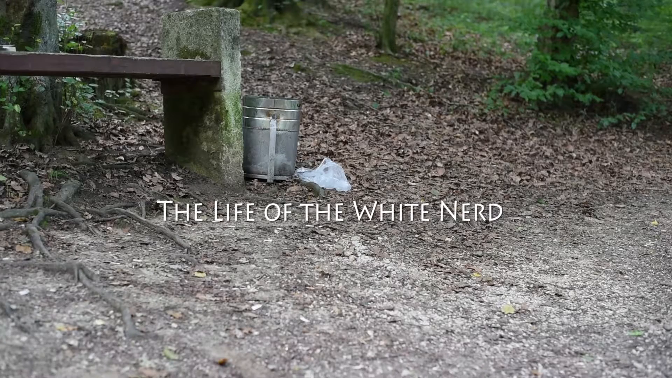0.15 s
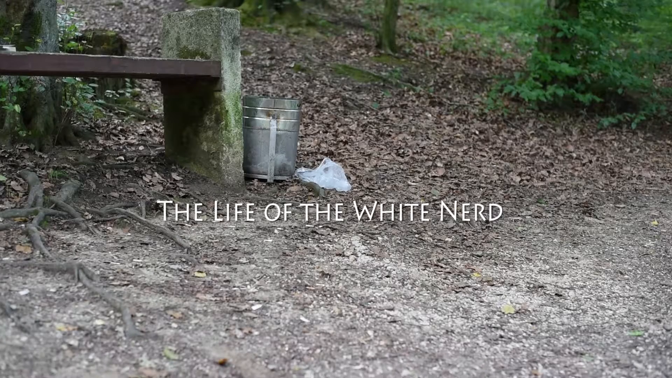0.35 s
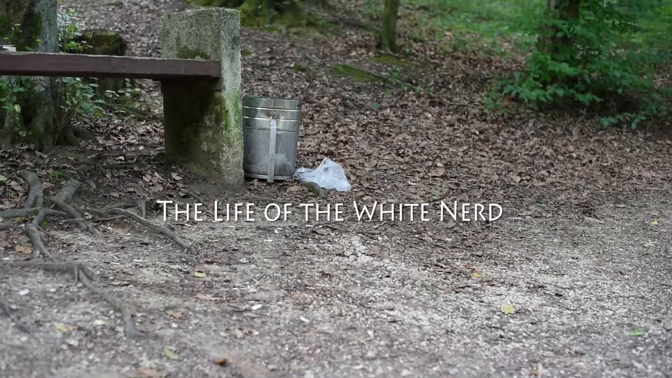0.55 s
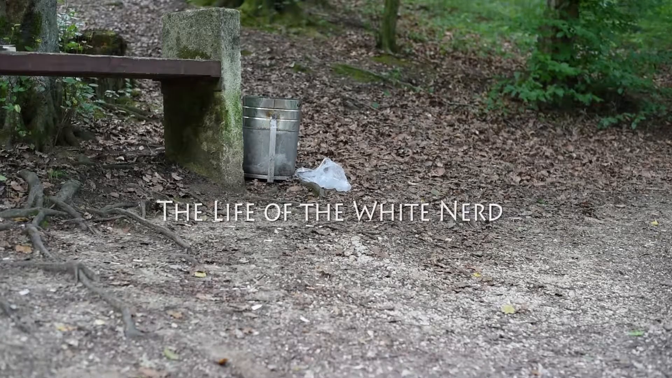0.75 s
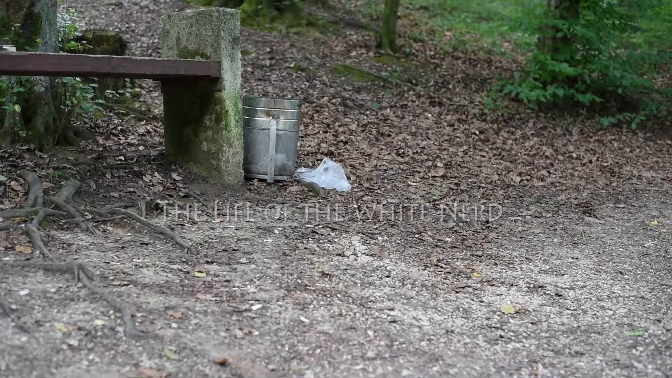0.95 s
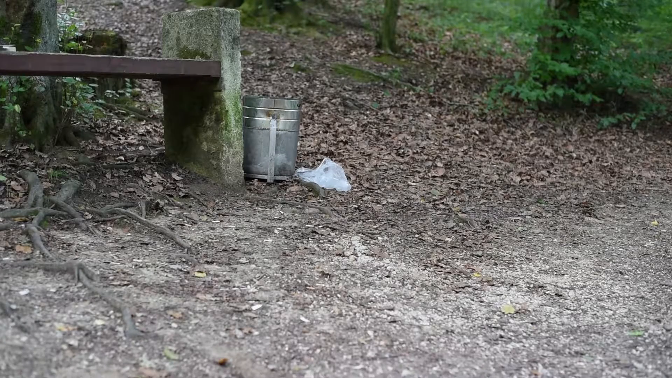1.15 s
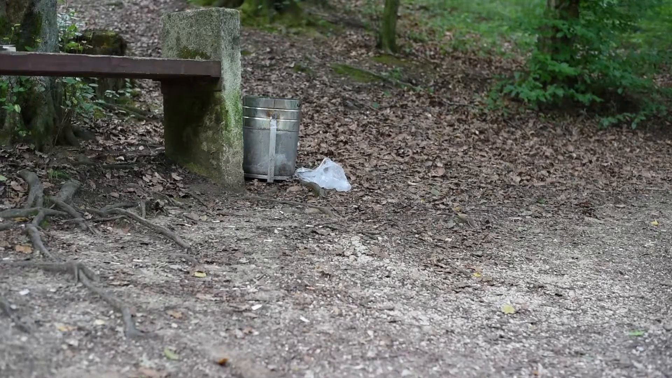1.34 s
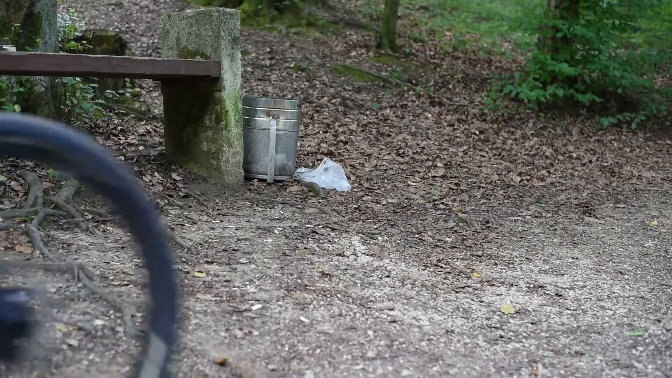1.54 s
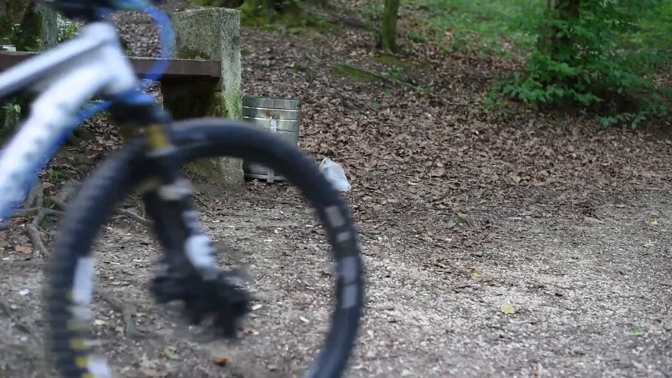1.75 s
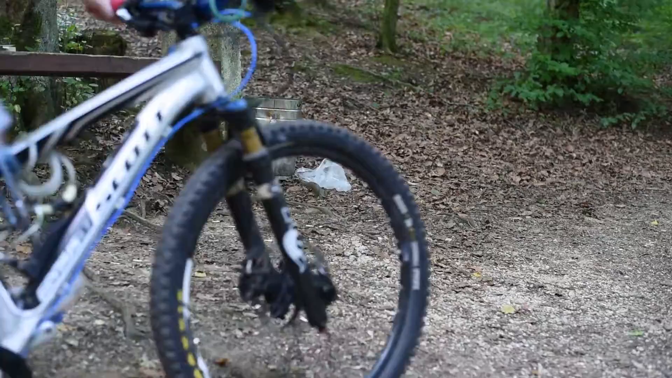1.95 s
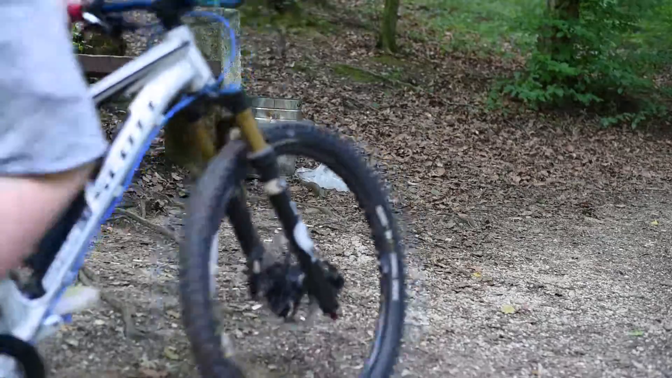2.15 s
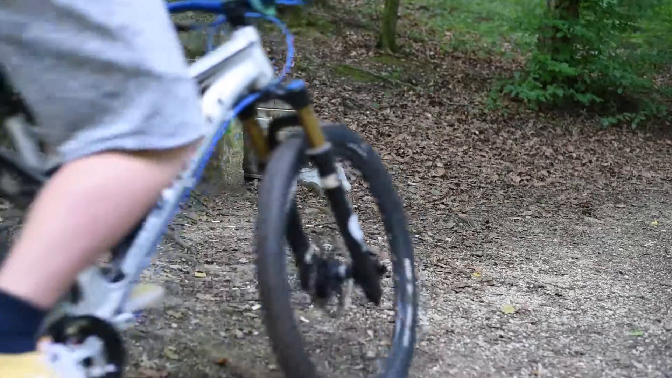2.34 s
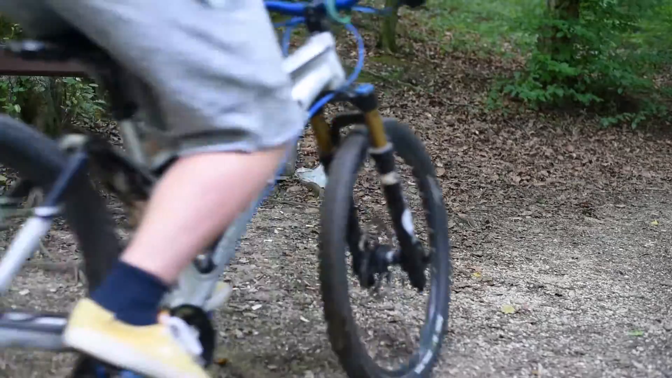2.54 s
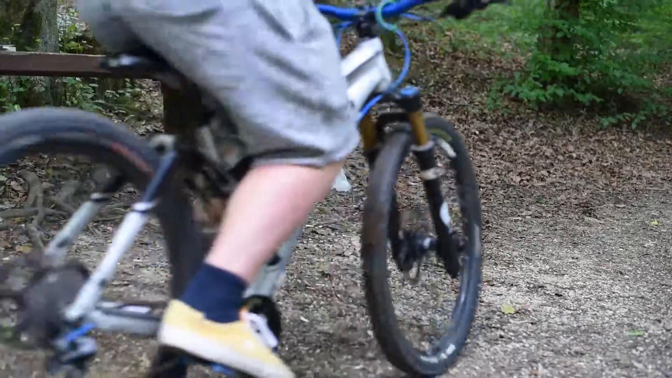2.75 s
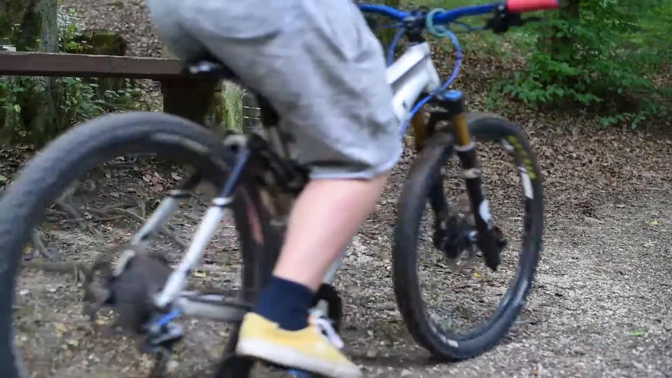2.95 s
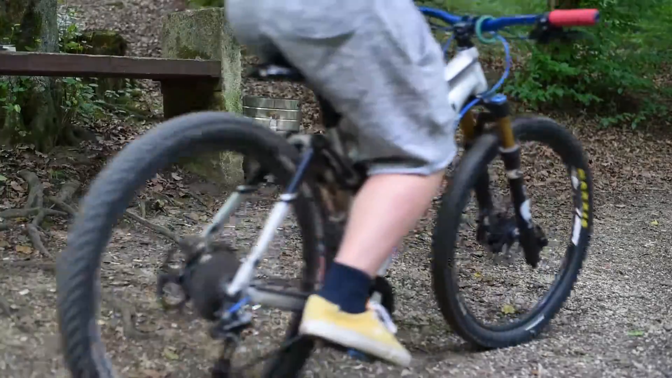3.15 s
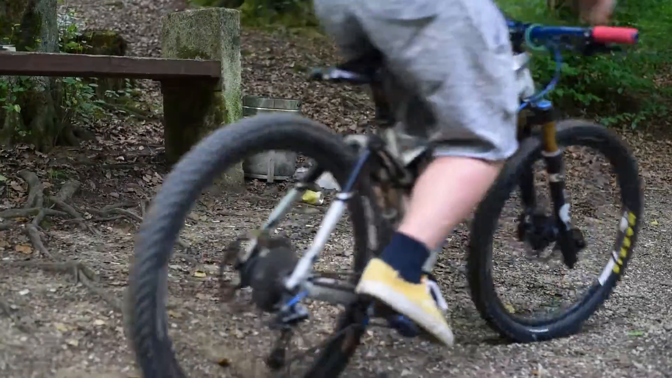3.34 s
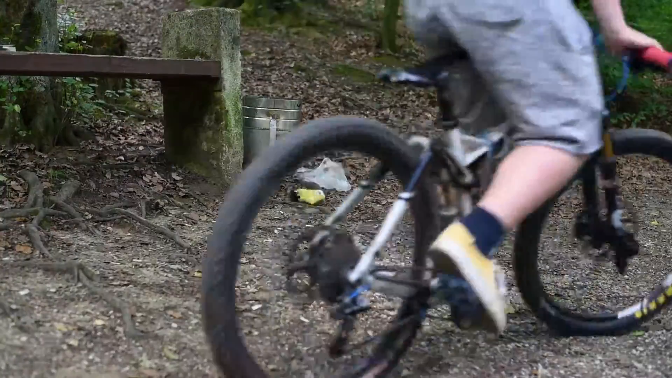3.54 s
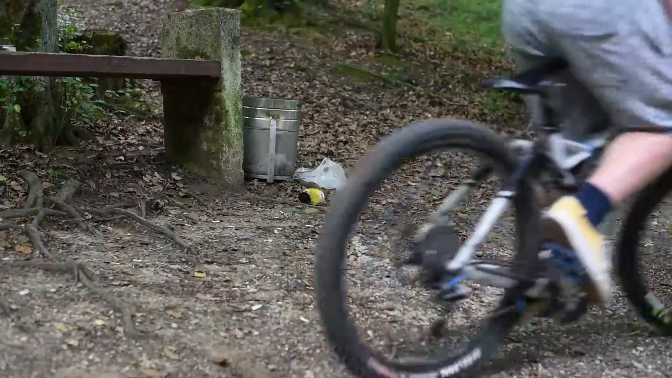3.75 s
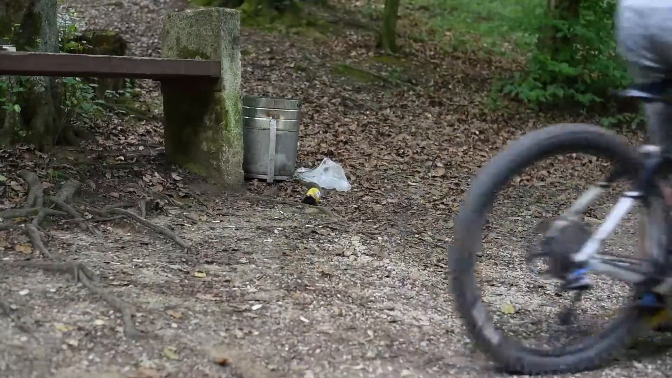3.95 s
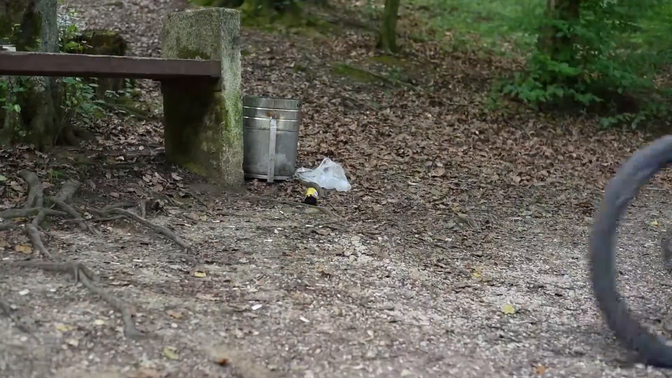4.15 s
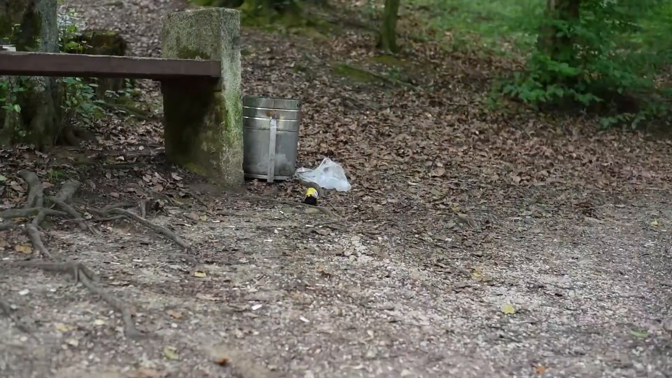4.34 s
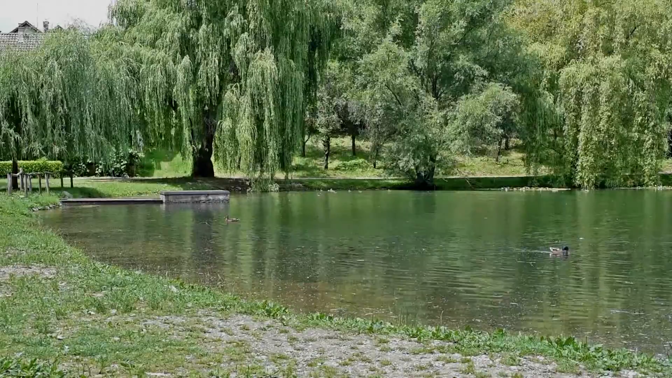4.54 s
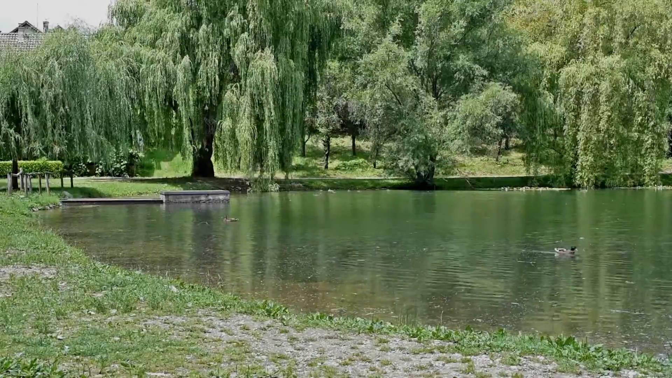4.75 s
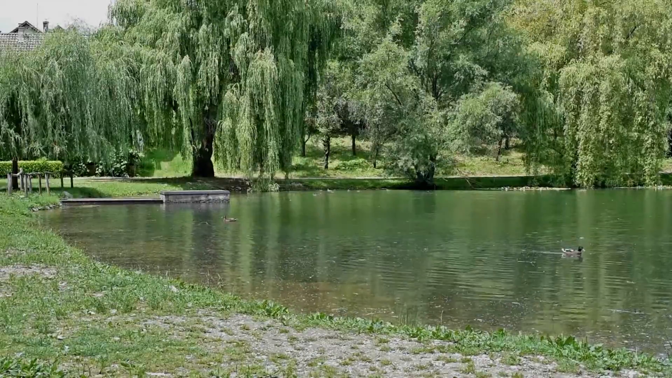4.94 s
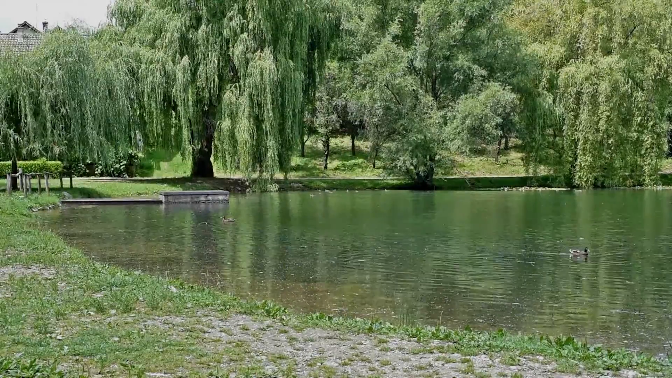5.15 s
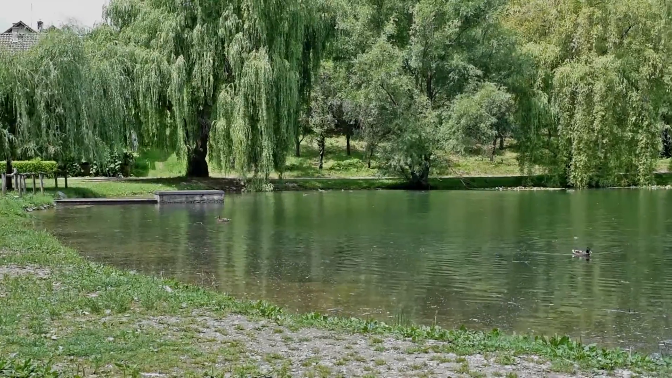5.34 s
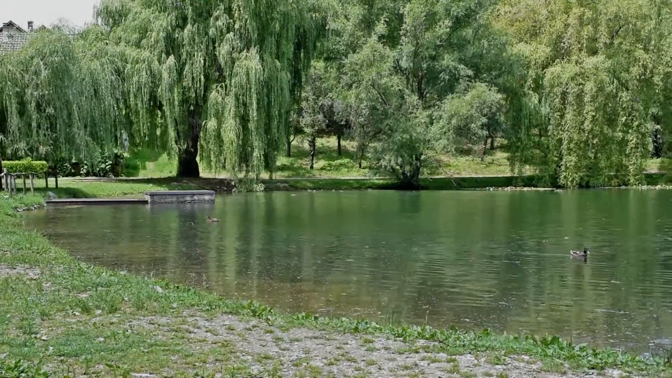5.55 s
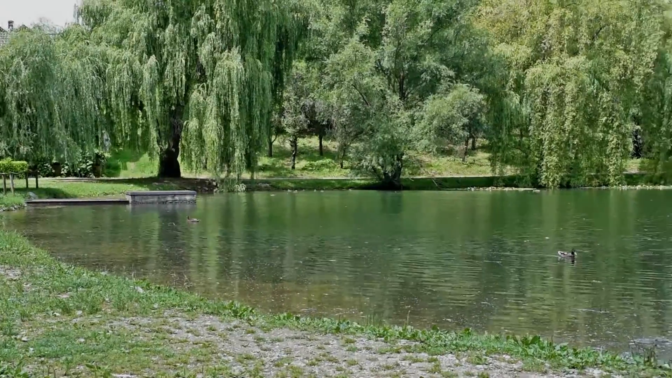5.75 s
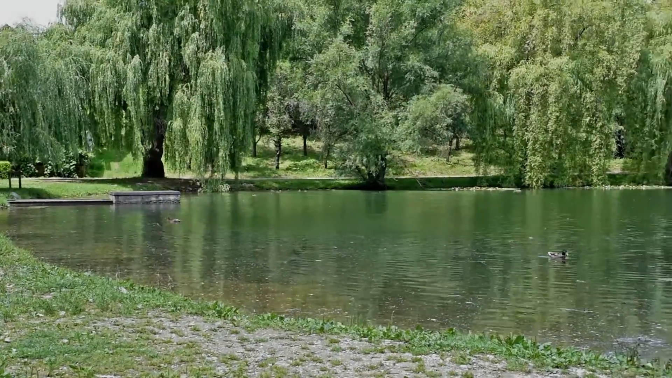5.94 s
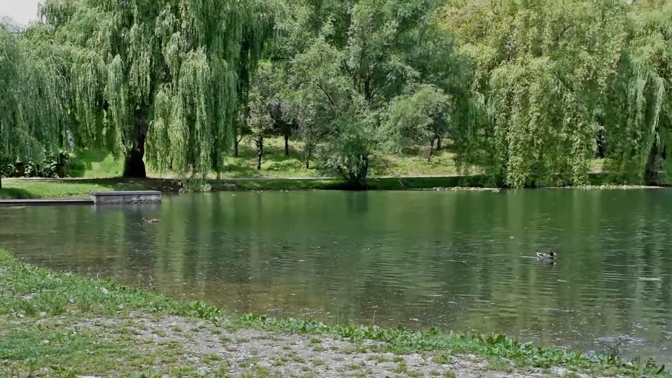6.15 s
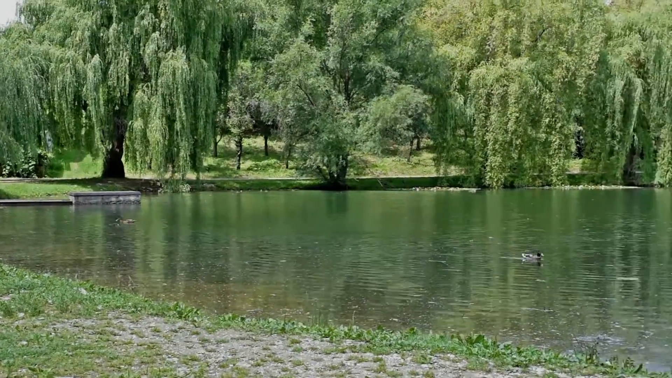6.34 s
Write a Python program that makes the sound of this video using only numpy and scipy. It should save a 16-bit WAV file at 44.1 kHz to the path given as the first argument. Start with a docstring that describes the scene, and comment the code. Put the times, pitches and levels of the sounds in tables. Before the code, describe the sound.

A quiet wood with soft air and short, echoing bird whistles; faint gravel crunch and a few pebble snaps come from the left. From about 1.0 to 1.8 seconds a freewheel ticks evenly and the tyres draw near over grit and dry leaves. The crunch peaks near 1.8-2.0 with dull thumps and sharp stone cracks. At 2.2-2.45 the chain rattles quickly, then a narrow metallic scrape slides upward until 2.6. Crisp clicks lead to heavy, jingling chain clanks at 2.98 and 3.06, with lighter knocks to 3.7. The bike moves right, leaving softer crunch, stray stone snaps and gear clicks. Birds brighten, strongest around 4.5-5.0, over a faint low engine throb. Around 5.0-5.5 faint ticks and crunch vanish as the wood fades into lakeside air, with a drawn-out call and rapid thin chirps from 6 seconds to the end.

```python
"""Tyres crunch softly over gravel in a quiet wood with birdsong; a mountain bike coasts past, left to right.
Random grains of grit and leaves make the crunch; short cracks with noise make stones, thumps and freewheel ticks.
The chain knocks, rings the frame and jingles through a gear change, and its drag sings through sliding resonances.
Birds are sliding whistles with echo, a far engine is a few harmonics, the air is coloured noise.
At the end the wood fades into a lakeside with other birds."""
import sys
import numpy as np
from scipy import signal
from scipy.fft import rfft, irfft
from scipy.io import wavfile
from scipy.ndimage import map_coordinates

SR = 44100
rng = np.random.default_rng(int(sys.argv[2]) if len(sys.argv) > 2 else 0)


def digitize_waveform(pressure):
    """Quantize a signal to 16-bit integers and store it at the path in sys.argv[1].

    Rows of a 2-D input are taken as channels; values are limited to [-1, 1].
    """
    field = np.atleast_2d(pressure).T
    bounded = np.clip(field, -1, 1)
    quanta = np.round(bounded * 32767).astype(np.int16)
    wavfile.write(sys.argv[1], SR, quanta)


N = 282240
T = np.arange(N) / SR


def amp(db):
    """Decibels to gain."""
    return 10 ** (np.asarray(db) / 20)


def unit(x):
    """Scales to rms 1."""
    return x / np.sqrt(np.mean(x ** 2) + 1e-20)


def read(points, hz):
    """A spectrum table read on a log-frequency axis."""
    f, value = np.transpose(points)
    return np.interp(np.log(hz + 1), np.log(f), value)


def curves(rows):
    """The columns of a time table at every sample."""
    s, *columns = np.transpose(rows)
    return [np.interp(T, s, column) for column in columns]


def add(mix, s, sound):
    """Mixes a sound in at time s."""
    part = mix[max(round(s * SR), 0):][:len(sound)]
    part += sound[:len(part)]


def drift(hz, size=N):
    """Slow random signal of rms 1, up to about hz."""
    lowpass = 1 + (np.fft.rfftfreq(size, 1 / SR) / hz) ** 4
    return unit(irfft(rfft(rng.standard_normal(size)) / lowpass, size))


def colour(x, points):
    """Minimum-phase filter of unit energy with the given spectrum, so that attacks stay sharp."""
    log_gain = np.log(amp(read(points, abs(np.fft.fftfreq(4096, 1 / SR)))))
    taps = np.fft.ifft(np.exp(np.conj(signal.hilbert(log_gain)))).real[:2048]
    return signal.oaconvolve(x, taps / np.linalg.norm(taps))[:len(x)]


def echo(x, t60s):
    """Diffuse stereo tail of noise, each band dying at its own speed."""
    hz, t, z = signal.stft(rng.standard_normal((2, SR)), SR, nperseg=256)
    tail = signal.istft(z * amp(-60 * t / read(t60s, hz)[:, None]), SR, nperseg=256)[1]
    tail = np.pad(tail, ((0, 0), (SR // 1500, 0)))  # starts 0.66 ms late
    return signal.fftconvolve(x[None], tail / np.linalg.norm(tail[0]), axes=1)[:, :N]


def place(x, side, lag_s=0.00016, shade_db=2.0, treble_shade_db=6.5, scatter_db=-5, split_hz=4000):
    """The nearer microphone hears a source sooner and louder, most of all its treble, which the ground scatters."""
    pair = np.array([map_coordinates(x, [(T + ear * side * lag_s) * SR], order=3) for ear in (-1, 1)])
    highpass = signal.butter(1, min(split_hz, SR / 4), "high", fs=SR)
    treble = signal.lfilter(*highpass, pair)
    toward = np.array([[-1], [1]]) * side
    scatter = amp(scatter_db) * echo(signal.lfilter(*highpass, x), [(500, 0.055), (10000, 0.028)])
    return amp(toward * shade_db) * (pair - treble) + amp(toward * treble_shade_db) * (treble + scatter)


def crack(t, hz, cycles):
    """A blow that swells and dies within a few cycles."""
    u = t * hz / cycles
    return np.sin(2 * np.pi * hz * t) * u * np.exp(1 - u)


def air(points, coherence, swell_db):
    """Distant wash of the open air: coloured noise, its likeness on the two sides set per frequency."""
    hz = np.fft.rfftfreq(N, 1 / SR)
    a, b = rfft(rng.standard_normal((2, N))) * amp(read(points, hz))
    alike = np.clip(read(coherence, hz), -1, 1)
    pair = np.array([a, alike * a + np.sqrt(1 - alike ** 2) * b])
    return unit(irfft(pair, N)) * amp(swell_db * drift(10.6))


# Wash of each place. Each row: frequency in Hz, relative density in dB per Hz.
FOREST_AIR_SPECTRUM = [(20, -34), (45, 0), (80, -1), (130, 6.5), (250, 2), (500, -4), (1000, -27),
                       (2000, -13), (3000, 0.5), (5000, -3), (9000, -8), (16000, -23.5)]
LAKE_AIR_SPECTRUM = [(25, -12), (160, 1), (450, -9.5), (640, -18), (1100, -11.5), (1800, -20.5),
                     (2600, -29.5), (4100, -31), (5200, -46), (10700, -36.5), (16000, -39)]
# Likeness of the two sides. Each row: frequency in Hz, coherence (no unit, clipped to -1..1).
FOREST_COHERENCE = [(250, 1), (650, 1), (1400, -1.2), (3000, -0.39)]
LAKE_COHERENCE = [(60, 0.59), (200, 0.82), (3000, 0.56)]
# Crossfade of the places. Each row: time in seconds, forest air in dB, lakeside air in dB.
PLACE_LEVELS = [(0, -57, -110), (4.8, -60, -76), (5.25, -61, -59), (5.5, -77, -54.5), (5.85, -100, -51.5),
                (6.15, -100, -49.5)]


def surroundings():
    """Forest air gives way to lakeside air."""
    forest_db, lake_db = curves(PLACE_LEVELS)
    forest = amp(forest_db) * air(FOREST_AIR_SPECTRUM, FOREST_COHERENCE, swell_db=2.0)
    return forest + amp(lake_db) * air(LAKE_AIR_SPECTRUM, LAKE_COHERENCE, swell_db=1.0)


# Far engine. Each row: time in seconds, level in dB before the unsteadiness, mean firing rate in Hz.
ENGINE_COURSE = [(0, -82, 25.72), (2.3, -64.5, 24.75), (3.3, -59.5, 24.43), (4.0, -61.5, 24.8),
                 (4.45, -52, 25.83), (5.18, -56.5, 26.43), (5.4, -70, 26.15)]
# Harmonics that carry. Each row: multiple of the firing rate, relative level in dB.
ENGINE_HARMONICS = [(2, 0.5), (3, 4.5), (4, 4), (5, -10.5), (6, -7)]


def engine(unsteady_db=3.0, spread_rad=0.0074):
    """Only low harmonics of a far engine's throb carry through the trees, a little out of step on the two sides."""
    db, hz = curves(ENGINE_COURSE)
    turns = np.cumsum(hz * (1 + 0.0082 * drift(6.5))) / SR
    throb = sum(amp(level + unsteady_db * drift(25.0)) * np.exp(2j * np.pi * round(k) * turns)
                for k, level in ENGINE_HARMONICS)
    pair = np.array([(throb * np.exp(1j * ear * spread_rad)).real for ear in (-1, 1)])
    return amp(db) * unit(pair)


def song(notes, waver):
    """Each note is a whistle that slides fast, settles on its last pitch and flutters, the more the higher it is."""
    out, wobble = np.zeros(N + SR), waver * drift(263, size=N + SR)
    for s, length_s, start_hz, end_hz, db in notes:
        u = np.linspace(0, 1, round(length_s * SR))
        slide_hz = end_hz + (start_hz - end_hz) * (1 - u) ** 1.6
        hz = slide_hz * (1 + wobble[round(s * SR):][:len(u)] * end_hz / 4000)
        whistle = np.sqrt(2) * np.sin(2 * np.pi * np.cumsum(hz) / SR)
        add(out, s, amp(db) * signal.windows.tukey(len(u), .5) * whistle)
    return out[:N]


def chorus(start_s, span_s, note_s, level_db, low_hz, high_hz, count):
    """Short random notes of birds farther off, most of them falling in pitch or rising slightly."""
    pitches_hz = np.geomspace(low_hz, high_hz, count)
    notes = [(start_s + span_s * when, note_s * (.5 + long), hz, hz * (1.07 - 0.16 * fall), level_db)
             for (when, long, fall), hz in zip(rng.random((count, 3)), pitches_hz)]
    return song(notes, waver=0.013)


# Nearer birds of the wood, then chatter and drawn-out calls by the water.
# Each row: start in seconds, length in seconds, start pitch in Hz, end pitch in Hz, level in dB before trims.
WOOD_BIRD_NOTES = [(.04, 0.096, 1900, 1855, -66), (.345, 0.062, 3338, 3270, -47.5),
                   (.515, 0.066, 2620, 2660, -57), (.56, 0.22, 2270, 1975, -58), (.6, 0.1, 3240, 2960, -57),
                   (.89, 0.05, 4360, 4130, -53), (1.338, 0.064, 3300, 3240, -45),
                   (1.405, 0.088, 3090, 3300, -48.5), (3.28, 0.058, 5390, 5255, -45),
                   (3.32, 0.032, 3040, 2890, -45), (3.365, 0.034, 2900, 2415, -47.5),
                   (3.545, 0.044, 2990, 3255, -45), (3.618, 0.029, 4830, 5130, -42.5),
                   (3.642, 0.022, 4310, 4560, -39.5), (3.825, 0.074, 3080, 2460, -45.5),
                   (4.0, 0.066, 7370, 7710, -45.5), (4.143, 0.038, 3244, 3230, -46),
                   (4.215, 0.04, 4820, 5270, -43.5), (4.235, 0.03, 3970, 4690, -42),
                   (4.485, 0.052, 3190, 3323, -39), (4.548, 0.082, 4556, 4557, -36),
                   (4.643, 0.04, 3270, 2300, -45.5), (4.905, 0.05, 3500, 2720, -46),
                   (4.972, .022, 5330, 4500, -47.5), (4.985, 0.041, 4183, 4248, -36),
                   (5.15, 0.048, 3960, 3410, -46.5), (5.24, 0.059, 3480, 3020, -58),
                   (5.39, .045, 3070, 2660, -65)]
LAKE_BIRD_NOTES = [(5.49, 0.17, 7600, 7900, -64.5), (5.62, 0.2, 7930, 8570, -69.5),
                   (5.864, 0.018, 4950, 3640, -53.5), (5.88, .11, 3630, 2990, -59),
                   (6.0, 0.4, 1764, 1678, -60), (6.006, 0.02, 4760, 4100, -56),
                   (6.021, 0.015, 4780, 3930, -50), (6.045, 0.026, 3520, 3640, -49.5),
                   (6.098, 0.02, 4680, 4150, -49), (6.113, 0.013, 4530, 3700, -47.5),
                   (6.219, 0.0175, 4150, 3800, -51), (6.298, 0.018, 4680, 4070, -51),
                   (6.357, 0.0072, 4400, 4700, -55.5), (6.36, 0.072, 2210, 2570, -54.5)]
# Echo among the trunks, shared by birds and bike. Each row: frequency in Hz, t60 in seconds.
TRUNK_ECHO = [(100, 0.028), (1000, 0.43), (4000, 0.62), (9000, 0.58), (16000, 0.87)]


def birds(forest_db=-1, lake_db=-1, lake_direct_db=0):
    """Birds in the wood are mostly echo, the farthest nothing else; those by the water come over more directly."""
    near, lake = song(WOOD_BIRD_NOTES, waver=.008), song(LAKE_BIRD_NOTES, waver=.025)
    deep = chorus(0, 5.3, note_s=0.069, level_db=-57, low_hz=2300, high_hz=4500, count=56)
    lake = lake + chorus(6.0, 0.37, note_s=0.022, level_db=-56, low_hz=3700, high_hz=4500, count=16)
    wood = echo(near + deep, TRUNK_ECHO) + amp([[-6], [-4]]) * near  # direct gain left, right
    shore = echo(lake, [(1500, 0.46), (4000, 1.3), (8000, 0.55)]) + amp(lake_direct_db) * lake
    return amp(forest_db) * wood + amp(lake_db) * shore


def resonate(x, hz, width_hz):
    """A resonance that follows the curve hz."""
    turn, r = np.exp(2j * np.pi * np.cumsum(hz) / SR), np.exp(-np.pi * width_hz / SR)
    return (turn * signal.lfilter([(1 - r) ** 2], [1, -2 * r, r * r], x / turn)).real


# Chain dragging along a sprocket. Each row: time in seconds, level in dB before catching, mean resonance in Hz.
DRAG_COURSE = [(2.415, -90, 930), (2.428, -41, 967), (2.49, -45.5, 1000), (2.52, -50.5, 1010),
               (2.61, -53, 1080), (2.645, -78, 1080)]
# Its resonances. Each row: multiple of the resonance, width in Hz, relative level in dB.
DRAG_RESONANCES = [(1, 70, 0), (2.1, 69, -8), (2.42, 80, -7)]


def drag(flutter=0.013, catch_db=3):
    """Links scrape over the teeth and excite a few narrow resonances that slide upward together."""
    db, hz = curves(DRAG_COURSE)
    hz, rub = hz * (1 + flutter * drift(37)), rng.standard_normal(N)
    sounding = (T > DRAG_COURSE[0][0]) & (T < DRAG_COURSE[-1][0])
    level = sounding * amp(db + catch_db * drift(70))
    return level * sum(amp(mode_db) * unit(resonate(rub, k * hz, width_hz))
                       for k, width_hz, mode_db in DRAG_RESONANCES)


# Chain and frame clanks. Each row: time in seconds, blow in dB before trim, blow pitch in Hz,
# ring in dB before trim and rattle, jingle in dB before trim, jingle t60 in seconds.
CHAIN_CLANKS = [(2.217, -36, 1000, -37, -37, 0.032), (2.283, -33.5, 1000, -42, -43.5, 0.075),
                (2.326, -35, 1140, -43, -50, 0.042), (2.368, -33, 1190, -42, -38.5, 0.058),
                (2.387, -47, 610, -42, -36, 0.019), (2.423, -53, 900, -34.5, -33, 0.049),
                (2.444, -40, 1180, -54, -33, 0.22), (2.976, -16.5, 740, -42, -32, 0.52),
                (3.059, -21.5, 577, -31.5, -34.5, 0.65), (3.273, -28, 622, -36, -57, 0.76),
                (3.458, -38, 1210, -43.5, -54, 0.12), (3.559, -34, 1370, -36.5, -50.5, 0.19),
                (3.643, -52, 1420, -41, -47.5, 0.053), (3.681, -53, 626, -43.5, -46, 0.035),
                (3.727, -49, 1310, -40, -46.5, 0.065)]
# Ring of frame and wheels. Each row: frequency in Hz, relative level in dB, t60 in seconds.
FRAME_MODES = [(214, 12, 0.43), (438, 10.5, 0.36), (595, 9, 0.22), (626, 9.5, 0.2), (754, 1, 0.72),
               (881, 17, 0.16), (1000, 10, 0.27), (1220, 3, 0.5), (1340, 7, 0.21), (1724, 19.5, 0.07),
               (2100, 14, 0.2), (2400, 27.5, 0.044)]
# Jingle of the links. Each row: frequency in Hz, relative density in dB per Hz.
CHAIN_SPECTRUM = [(200, -25), (450, -2.5), (1400, 3), (1900, -9), (3000, -7), (4200, -4.5), (6700, 0.5),
                  (9100, 3.5), (13400, -13), (16000, -25)]
# loose parts rattle against the frame and make its ring uneven
RING_RATTLE_DB, RING_RATTLE_HZ = 1.3, 70


def drivetrain(knock_cycles=0.53, clatter_db=-13, clatter_t60_s=0.12, reach_octaves=0.59, slap_db=-3, slap_s=0.0072):
    """The chain lands on a sprocket: a knock, the frame rings around the pitch of the blow, the links jingle."""
    t, out = np.arange(SR // 2) / SR, np.zeros(N)
    for s, blow_db, hz, ring_db, jingle_db, jingle_t60_s in CHAIN_CLANKS:
        weights = np.array([amp(db) * np.exp(-(np.log2(f / hz) / reach_octaves) ** 2 / 2)
                            for f, db, _ in FRAME_MODES])
        weights = weights / np.linalg.norm(weights)
        ring = sum(w * amp(-60 * t / t60_s) * np.sin(2 * np.pi * (f * t + rng.random()))
                   for w, (f, _, t60_s) in zip(weights, FRAME_MODES))
        ring = ring * amp(RING_RATTLE_DB * drift(RING_RATTLE_HZ, size=len(t)) - RING_RATTLE_DB)
        clatter_spectrum = [(hz / 6, -17), (hz / 2, -1), (hz, 0), (hz * 2, -5), (hz * 4.4, -17), (hz * 10, -40)]
        clatter = colour(rng.standard_normal(len(t)) * amp(-60 * t / clatter_t60_s), clatter_spectrum)
        links = rng.standard_normal(len(t)) * amp(0.22 * drift(210, size=len(t)) - 60 * t / jingle_t60_s)
        links = links * (1 + amp(slap_db) * np.exp(-t / slap_s))
        blow = crack(t, hz, knock_cycles) + amp(clatter_db) * clatter
        add(out, s, amp(blow_db) * blow + amp(ring_db) * ring + amp(jingle_db) * colour(links, CHAIN_SPECTRUM))
    return out


# Spells of coasting with even ticks. Each row: first tick in seconds, last tick in seconds, number of ticks.
COAST_SPELLS = [(1.032, 1.087, 2), (1.132, 1.444, 9), (1.506, 1.633, 5), (1.670, 1.805, 4),
                (2.798, 2.855, 2), (2.902, 2.945, 2), (4.969, 5.12, 4), (5.243, 5.332, 5)]
# Rear hub coming near and turning away. Each row: time in seconds, tick in dB before trims,
# body relative to snap in dB, side from about -1 left to 1 right.
HUB_COURSE = [(1.0, -35, -22, -0.76), (1.45, -32, 0, -1.07), (1.72, -23, -0.5, -0.43), (2.2, -32, 4, 0.068),
              (2.7, -23.5, -1.5, -0.058), (2.9, -21.5, -7.5, -0.21), (4.2, -42, -22, 0.98),
              (5.35, -49.5, -15, 0.62)]
# Single clicks of the gears. Each row: time in seconds, level in dB before trims.
GEAR_CLICKS = [(1.477, -26), (1.775, -21.5), (1.97, -25), (2.15, -30.5), (2.162, -27.5), (2.7012, -19),
               (2.709, -28), (2.952, -21.5), (4.166, -26.5), (4.355, -25), (4.81, -41.5)]
# Bright snap and body of a pawl. Each row: frequency in Hz, relative density in dB per Hz.
PAWL_SNAP_SPECTRUM = [(2000, -35), (5000, -8.5), (6500, -5.5), (8500, 0.5), (10200, 4.5), (11500, -3),
                      (13000, -4), (16000, -17)]
PAWL_BODY_SPECTRUM = [(500, -31), (1500, -8), (2800, 2.5), (4000, -5), (6000, -10.5), (9000, -1),
                      (16000, -77)]
TICK_SPREAD_DB, TICK_RISE_S = 0.5, 0.0006


def freewheel(level_db=-5, click_db=-6, snap_s=0.0016, ring_s=0.0097, ring_db=-19,
              strike_db=6, strike_hz=8500, strike_cycles=0.64):
    """Each pawl drops onto its tooth: a hard strike, a bright snap and a short dense ring of the hub."""
    t, out = np.arange(SR // 10) / SR, np.zeros(N)
    decay = np.exp(-t / snap_s) + amp(ring_db) * np.exp(-t / ring_s)
    shape = (1 - np.exp(-t / TICK_RISE_S)) * decay
    strike = amp(strike_db) * crack(t, strike_hz, strike_cycles)
    tick_db, body_db, _ = curves(HUB_COURSE)
    ticks = [(s, np.interp(s, T, tick_db) + level_db + TICK_SPREAD_DB * rng.standard_normal())
             for spell in COAST_SPELLS for s in np.linspace(*spell)]
    clicks = [(s, db + click_db) for s, db in GEAR_CLICKS]
    for s, db in ticks + clicks:
        snap, body = rng.standard_normal((2, len(t))) * shape
        body = amp(np.interp(s, T, body_db)) * colour(body, PAWL_BODY_SPECTRUM)
        add(out, s, amp(db) * (strike + colour(snap, PAWL_SNAP_SPECTRUM) + body))
    return out


# Buried stones and roots under the tyre. Each row: time in seconds, level in dB, pitch in Hz.
TYRE_THUMPS = [(0.827, -42, 453), (1.259, -33.5, 880), (1.373, -33.5, 700), (1.822, -33, 556),
               (1.849, -24, 845), (1.868, -26.5, 546), (1.883, -33, 383), (2.0, -29.5, 515),
               (3.37, -42.5, 182)]


def thumps(cycles=0.53, grind_db=-8, grind_s=0.01):
    """The knobbly tyre gives a dull push, and the stone grinds briefly in its bed."""
    t, out = np.arange(SR // 15) / SR, np.zeros(N)
    for s, db, hz in TYRE_THUMPS:
        spectrum = [(hz / 6, -14), (hz / 2, -3), (hz, 0), (hz * 2, -9), (hz * 8, -24)]
        grind = colour(rng.standard_normal(len(t)) * np.exp(-t / grind_s), spectrum)
        add(out, s, amp(db) * (crack(t, hz, cycles) + amp(grind_db) * grind))
    return out


# Large stones snapping from under the tread. Each row: time in seconds, level in dB before trims, pitch in Hz.
LARGE_STONES = [(0.283, -26.5, 2500), (0.74, -22, 2500), (0.959, -24.5, 2540), (1.261, -26.5, 3066),
                (1.373, -28, 3080), (1.68, -21.5, 2360), (1.823, -17.5, 2660), (1.959, -27, 3100),
                (1.9945, -18.5, 2890), (2.0, -19, 2000), (3.412, -30, 2500), (3.691, -20, 2680),
                (3.769, -20.5, 3030), (3.939, -25.5, 2600), (4.068, -17, 2220), (4.484, -23.5, 2520),
                (5.176, -31.5, 2100)]
# small stones slip at random while the bike rolls; level before trims
PEBBLES_PER_S, PEBBLE_DB, PEBBLE_SPREAD_DB, PEBBLE_HZ, ROLL_S = 2.5, -35.5, 2, 2100, 5.0


def stones(level_db=-1, cycles=0.54, scatter_db=-17, scatter_s=0.0024):
    """A pebble slips with a sharp crack and rattles against its neighbours."""
    t, out = np.arange(SR // 25) / SR, np.zeros(N)
    pebbles = [(s, PEBBLE_DB + PEBBLE_SPREAD_DB * rng.standard_normal(), PEBBLE_HZ * rng.uniform(0.92, 1.14))
               for s in rng.uniform(0, ROLL_S, round(PEBBLES_PER_S * ROLL_S))]
    for s, db, hz in list(LARGE_STONES) + pebbles:
        spectrum = [(hz / 20, -14), (hz / 6, -1), (hz, 0), (hz * 4, -16)]
        rattle = colour(rng.standard_normal(len(t)) * np.exp(-t / scatter_s), spectrum)
        add(out, s, amp(db + level_db) * (crack(t, hz, cycles) + amp(scatter_db) * rattle))
    return out


# Steady rolling. Each row: time in seconds, crunch of grit in dB before trim, fizz of dry leaves in dB.
ROLLING_LEVELS = [(0, -58, -66), (.9, -52, -57.5), (1.72, -49, -48), (2.06, -57.5, -54), (2.32, -59.5, -81),
                  (2.69, -58.5, -59.5), (2.85, -55.5, -54), (3.5, -54.5, -62.5), (3.87, -58.5, -56),
                  (4.45, -56, -57.5), (5.28, -57, -67.5), (5.5, -80, -81)]
# Bites into loose patches. Each row: time in seconds, hold in seconds, crunch in dB before trim, fizz in dB.
TREAD_BITES = [(1.574, 0.038, -54, -42), (1.828, 0.048, -36.5, -44.5), (1.916, 0.018, -40.5, -41.5),
               (2.134, 0.015, -50, -47), (2.386, 0.0059, -42, -45), (2.482, 0.097, -50.5, -47),
               (3.664, 0.08, -58.5, -53)]
BITE_RISE_S, BITE_RELEASE_S = 0.021, 0.067


def tread():
    """Levels of crunch and fizz in dB: steady rolling, and on top each bite swells, holds and dies away."""
    power = amp(np.array(curves(ROLLING_LEVELS))) ** 2
    for s, hold_s, crunch_db, fizz_db in TREAD_BITES:
        rise = (np.minimum(T - s, 0) / BITE_RISE_S) ** 2
        release = np.maximum(T - s - hold_s, 0) / BITE_RELEASE_S
        power = power + (amp([[crunch_db], [fizz_db]]) * np.exp(-rise - release)) ** 2
    return 10 * np.log10(power)


def grains(per_s, spread_db, low_hz, high_hz, cycles, clump_db, count=24):
    """Many tiny fractures of random size and pitch, bunched as each knob of the tread bites."""
    size_db = spread_db * np.minimum(rng.exponential(1, N), 4) + clump_db * drift(37.0)
    size = amp(size_db) * rng.choice([-1, 1], N)
    clicks = size * (rng.random(N) < per_s / SR)
    kind, out = rng.integers(0, count, N), np.zeros(N)
    for k, hz in enumerate(np.geomspace(low_hz, min(high_hz, SR / 2), count)):
        r = np.exp(-hz / cycles / SR)
        poles = [1, -2 * r * np.cos(2 * np.pi * hz / SR), r * r]
        ringing = signal.lfilter([1, 0, -1], poles, clicks * (kind == k))
        out += np.sqrt(hz * (1 - r)) * ringing * np.sqrt(1 - r)
    return out


# Grit, dry leaves and the packed bed below. Each row: frequency in Hz, relative density in dB per Hz.
GRIT_SPECTRUM = [(90, -29), (180, -26), (400, 13), (900, 7.5), (1600, 9), (2800, 9.5), (4200, -2),
                 (6500, -14.5), (10000, -19.5), (16000, -29)]
LEAF_SPECTRUM = [(1500, -56), (3500, 9), (5000, 5), (7000, 5.5), (9000, 3.5), (11000, -4), (14000, -13.5),
                 (16000, -53)]
BED_SPECTRUM = [(70, -6), (160, 2.5), (350, 1), (800, 2.5), (1600, -1), (3000, -11), (8000, -50)]


def tyres(side, crunch_db=1, fizz_db=0, spray_db=-3, shade_db=4, bed_db=-28, bed_growth=1.317):
    """The tread grinds grit and crushes dry leaves; the harder it bites, the more the packed bed below sounds."""
    crunch, fizz = tread()

    def patch():
        """Independent grains of grit and leaves under the tread."""
        grit = unit(colour(grains(1500, 1.07, 269, 8900, 0.98, 3.82, count=16), GRIT_SPECTRUM))
        leaves = unit(colour(grains(2000, 5.2, 4100, 14000, 0.98, 3.15, count=8), LEAF_SPECTRUM))
        return amp(crunch + crunch_db) * grit + amp(fizz + fizz_db) * leaves

    # grit thrown all around reaches each microphone differently, except in the bass
    spray = np.array([patch() * amp(ear * side * shade_db) for ear in (-1, 1)])
    spray = signal.lfilter(*signal.butter(2, 1500, "high", fs=SR), spray)
    bite_db = crunch + 30  # relative to a crunch of -30 dB
    bed = unit(colour(grains(1800, 2.23, 158, 2610, 1.0, 4.4, count=12), BED_SPECTRUM))
    bed = bed * amp(bed_db + bed_growth * bite_db)
    return place(patch() + bed, side) + amp(spray_db) * spray


# Where the tyres are. Each row: time in seconds, side from -1 left to 1 right.
TYRE_PATH = [(0, -0.66), (1.35, -0.69), (1.65, -0.23), (2.1, 0.12), (2.35, 0.29), (2.7, 0.088),
             (3.6, 0.076), (4.1, 0.29), (5.0, 0.47)]


def scene(hits_db=2, trees_db=-19):
    """The bike with the echo of its hits from the trunks, among birds, engine and open air."""
    side, = curves(TYRE_PATH)
    _, _, hub_side = curves(HUB_COURSE)
    ticks = amp(hits_db) * freewheel()
    knocks = amp(hits_db) * (stones() + drivetrain()) + thumps() + drag()
    bike = tyres(side) + place(knocks, side) + place(ticks, hub_side)
    trunks = amp(trees_db) * echo(ticks + knocks, TRUNK_ECHO)
    return bike + trunks + birds() + engine() + surroundings()


EDGE_HZ = 16200


def record(dry):
    """The recorder's band limit: a linear-phase low-pass."""
    lowpass = signal.firwin(255, EDGE_HZ, window=("kaiser", 9), fs=SR)
    return signal.oaconvolve(dry, lowpass[None], "same")


dry = scene()
out = record(dry)
digitize_waveform(out)
```